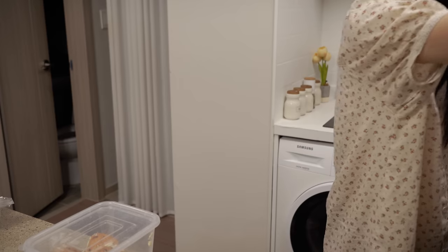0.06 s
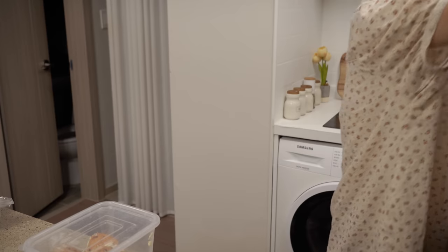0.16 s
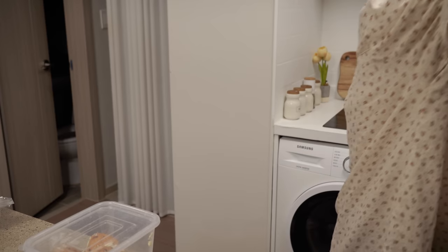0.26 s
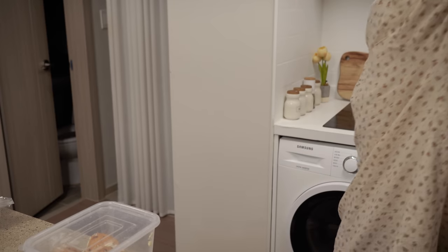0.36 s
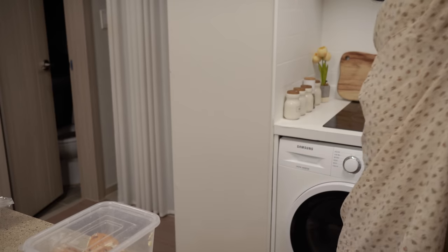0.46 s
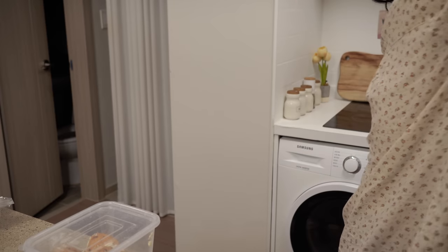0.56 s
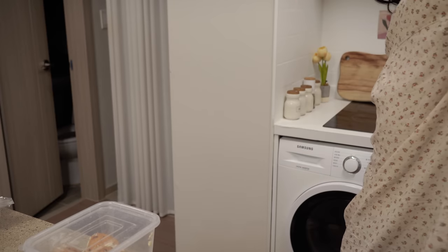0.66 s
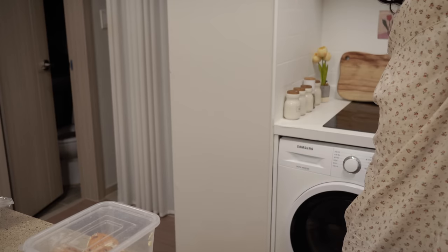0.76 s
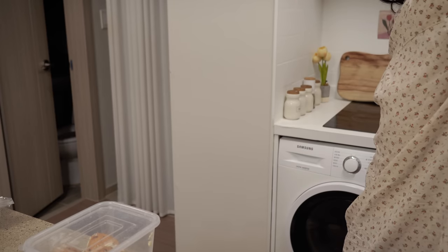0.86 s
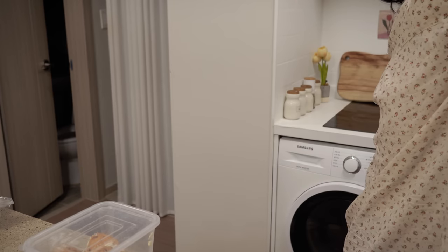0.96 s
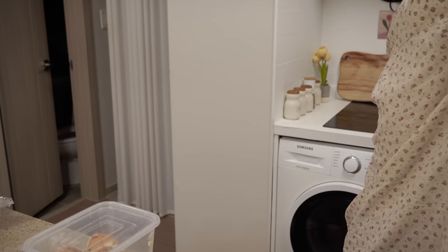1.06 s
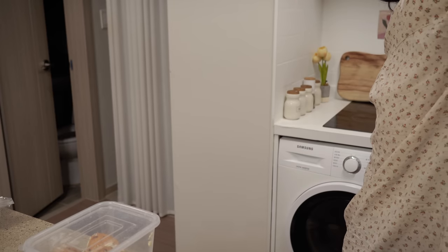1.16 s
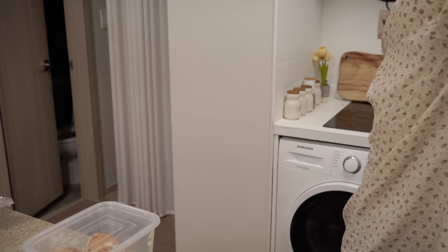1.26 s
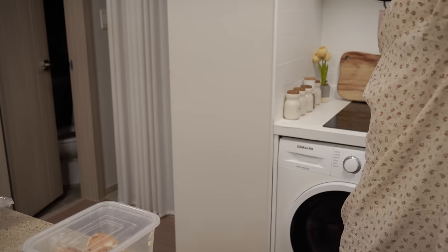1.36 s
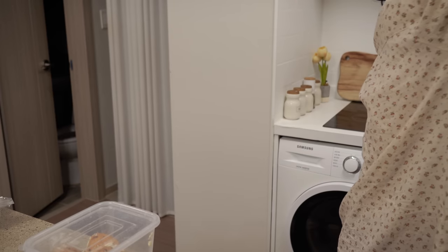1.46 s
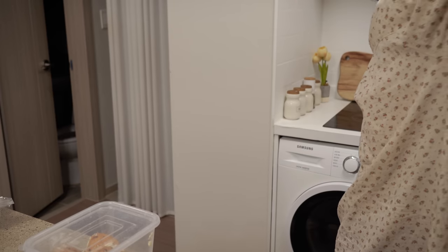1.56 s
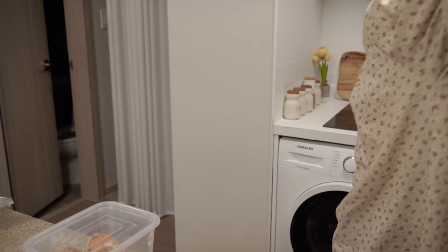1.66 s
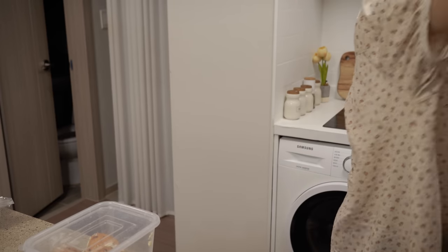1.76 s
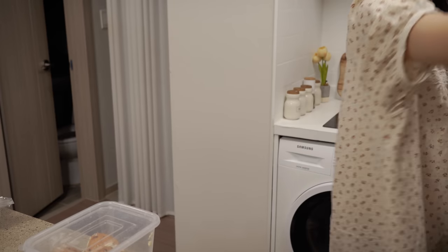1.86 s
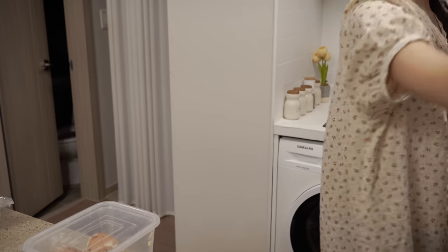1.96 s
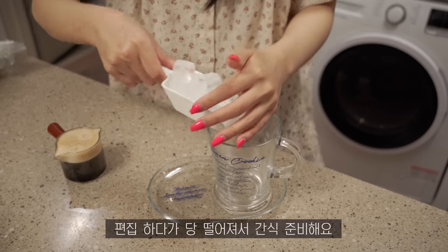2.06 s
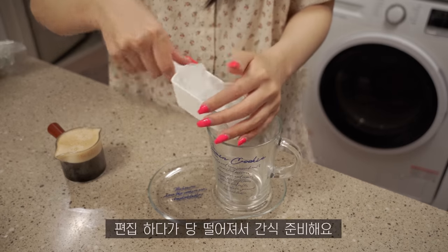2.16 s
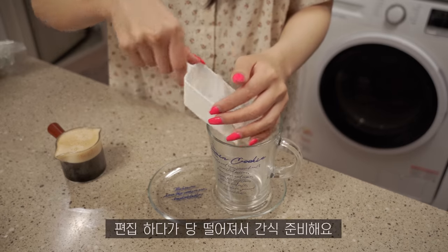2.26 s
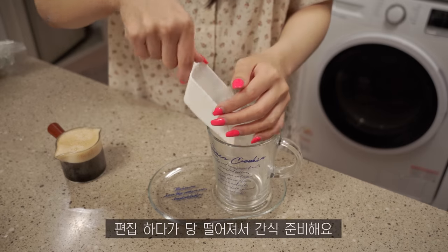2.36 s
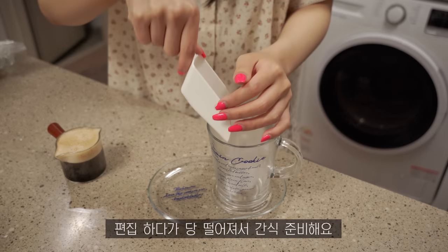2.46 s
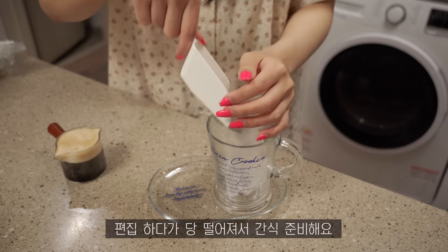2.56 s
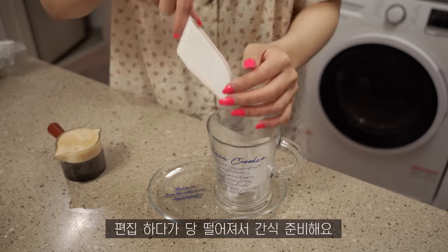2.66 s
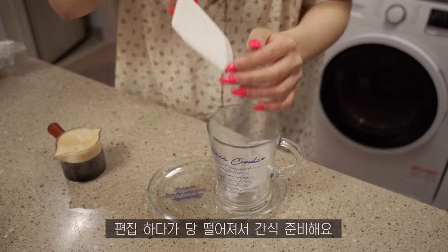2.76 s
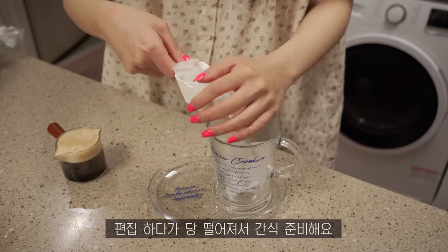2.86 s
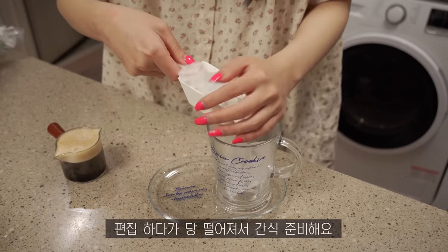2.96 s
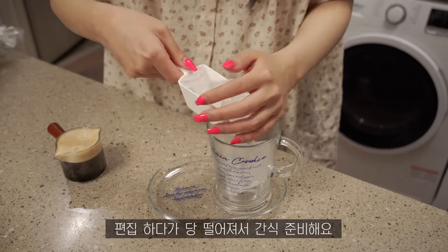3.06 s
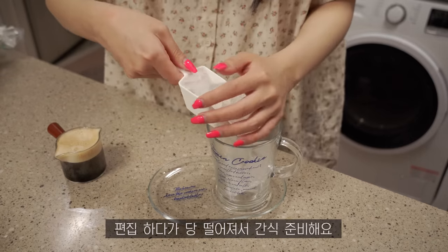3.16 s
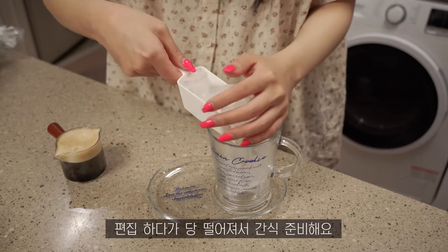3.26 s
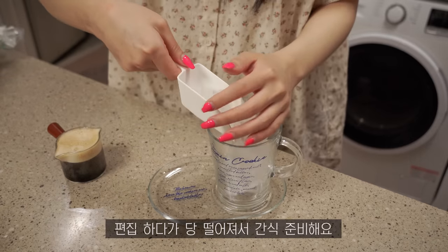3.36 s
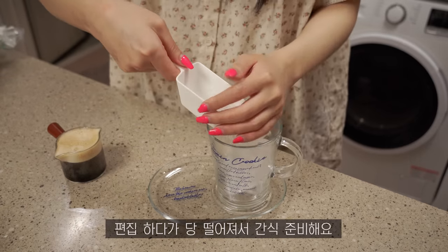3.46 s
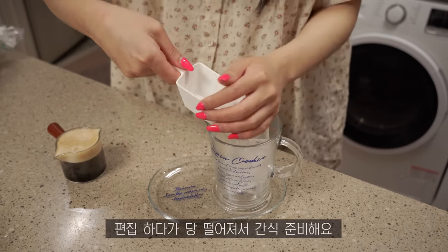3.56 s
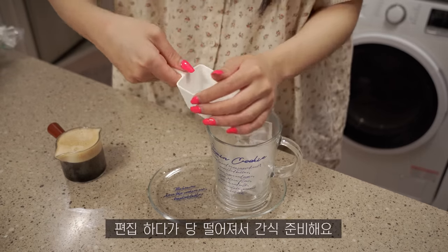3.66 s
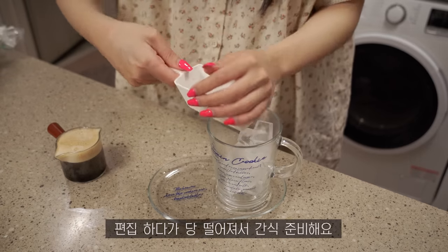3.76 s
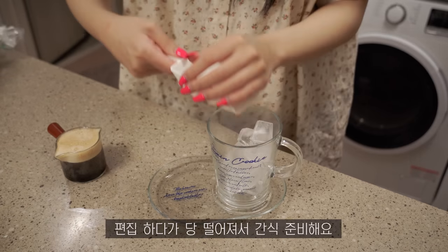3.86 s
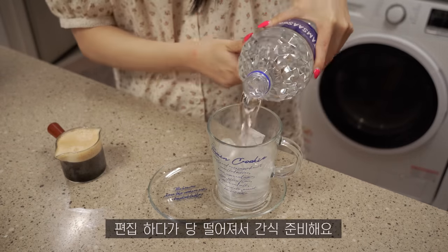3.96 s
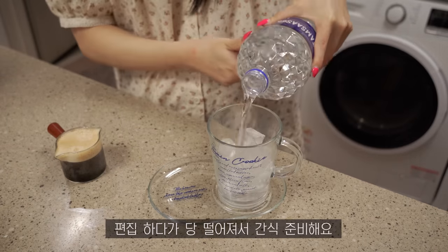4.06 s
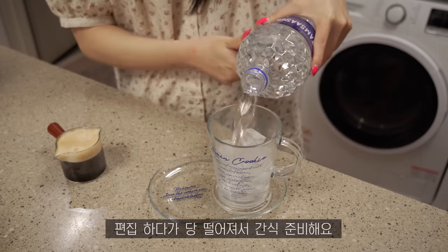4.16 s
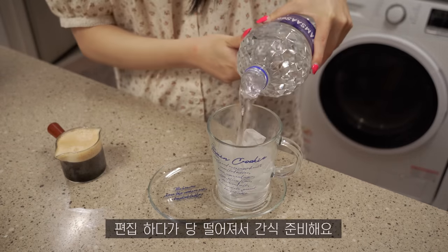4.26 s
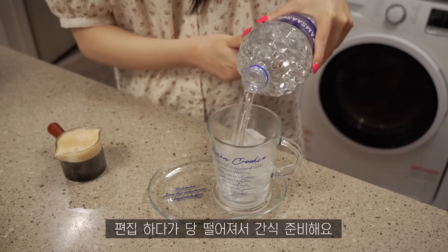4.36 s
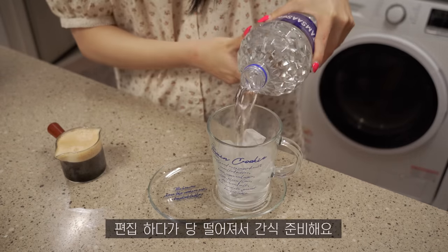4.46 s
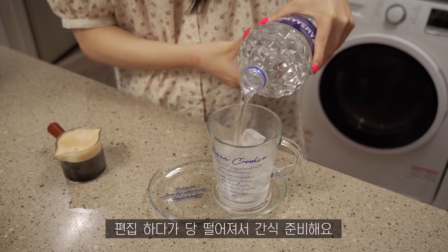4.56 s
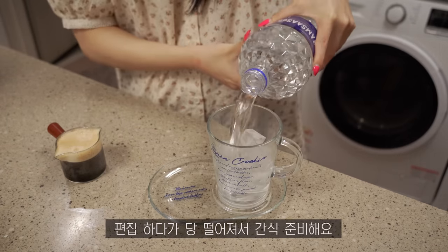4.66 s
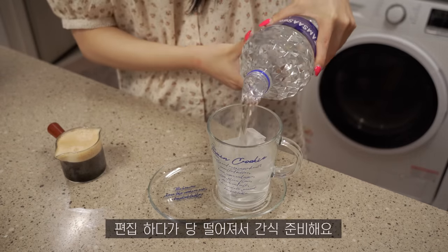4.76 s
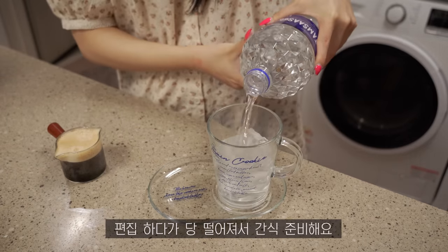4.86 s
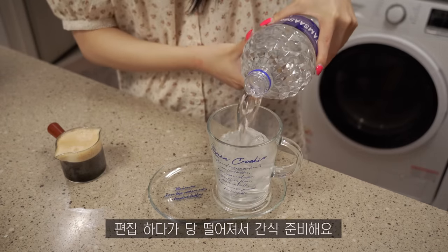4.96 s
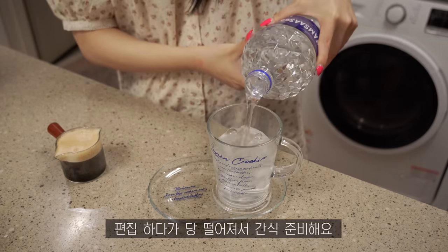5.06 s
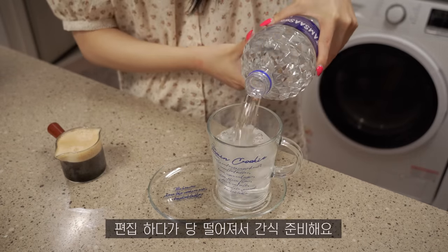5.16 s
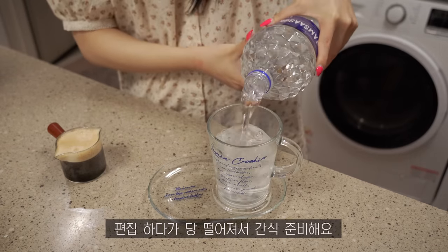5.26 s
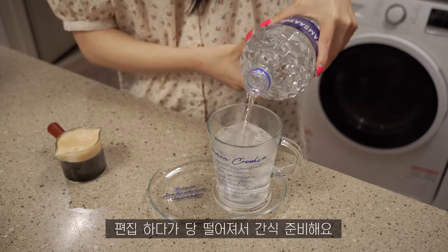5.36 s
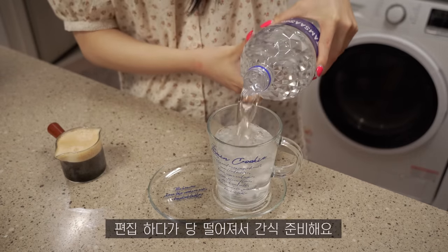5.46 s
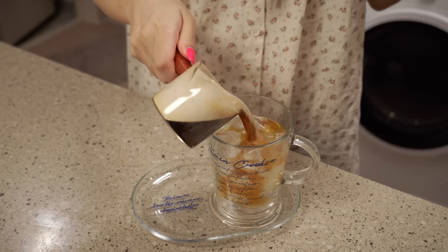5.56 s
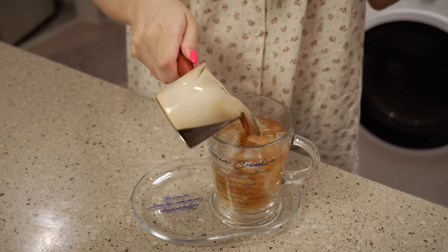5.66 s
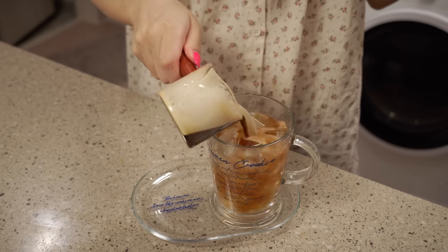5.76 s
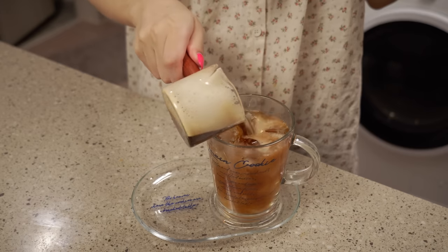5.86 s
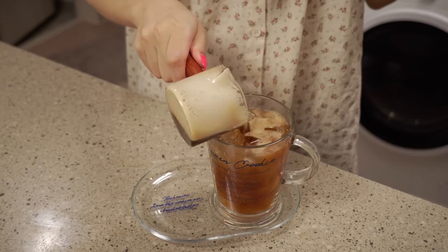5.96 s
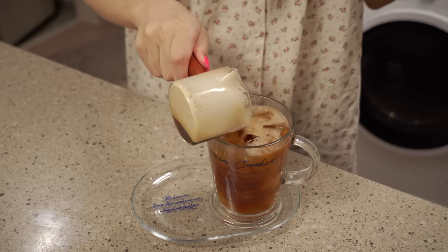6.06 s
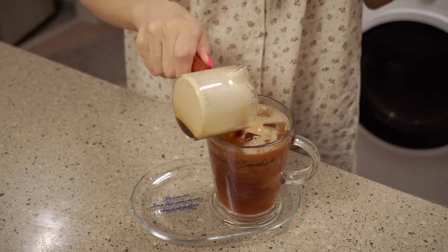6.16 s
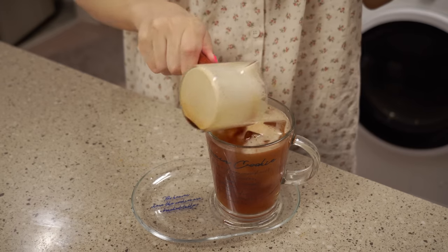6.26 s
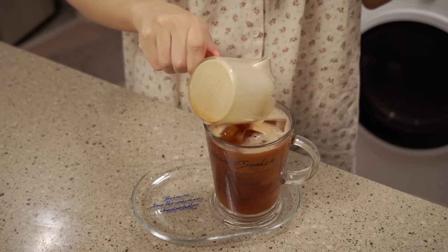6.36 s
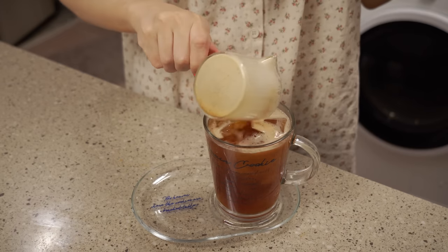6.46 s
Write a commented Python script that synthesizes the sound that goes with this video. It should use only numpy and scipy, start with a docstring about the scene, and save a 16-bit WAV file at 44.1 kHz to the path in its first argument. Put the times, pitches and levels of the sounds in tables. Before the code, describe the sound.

A door bumps shut and crockery clinks faintly across a small kitchen. Then, close to the microphone, ice cubes scrape and clack down a plastic scoop into a glass mug in two bursts, with bright glassy pings. Water pours over them, bubbling and gurgling while the ice snaps. Finally, a small jug and the full mug knock dully, with tiny squeaks, over a low hum.

```python
"""A small kitchen, where iced coffee is being made. A door bumps shut and crockery clinks across the room.
Close by, ice rattles out of a plastic scoop into a glass mug in two goes; water is poured over it,
bubbling while the cubes crack; then a small coffee jug knocks against the full mug, with faint squeaks.
Knocks are shaped noise, ringing things are sums of fading sine tones, and the water is a swarm of
short bubble notes. A made-up room echo surrounds each of them, over a low hum and a soft hiss."""
import sys
import numpy as np
from scipy import signal
from scipy.fft import rfft, irfft, next_fast_len
from scipy.io import wavfile
from scipy.ndimage import map_coordinates

SR = 44100
rng = np.random.default_rng(int(sys.argv[2]) if len(sys.argv) > 2 else 0)


def bounce(signal):
    """Save signal as a 16-bit WAV file at the path given by the first command-line argument."""
    frames = np.transpose(np.atleast_2d(signal))
    limited = np.clip(frames, -1, 1)
    pcm = np.round(limited * 32767).astype(np.int16)
    wavfile.write(sys.argv[1], SR, pcm)


N = 287973  # length of the scene in samples, about 6.5 s
T = np.arange(SR * 3 // 4) / SR  # clock in seconds for one short sound
TOP_HZ = 16300  # nothing sounds above this
POUR_START_S, POUR_END_S = 4.028, 5.52  # the bottle tips and, later, begins to be righted


def amp(db):
    """Turn decibels into a multiplier."""
    return 10 ** (np.asarray(db) / 20)


def unit(x):
    """Scale a sound to an rms level of 1."""
    return x / np.sqrt(np.mean(x ** 2) + 1e-20)


def along(points, hz):
    """Read (Hz, value) points at any frequency, joined by straight lines on a log axis."""
    point_hz, values = np.transpose(points)
    return np.interp(np.log(hz + 1), np.log(point_hz + 1), values)


def fade(t60, t=T):
    """Fade exponentially, losing 60 dB in t60 seconds."""
    return np.exp(-np.log(1000) * t / np.maximum(t60, 1e-4))


def add(track, s, sound):
    """Mix a sound into a track at s seconds, cutting what runs past the end."""
    part = track[round(s * SR):][:len(sound)]
    part += sound[:len(part)]


def filtered(x, response):
    """Multiply the spectrum of x by a function of frequency."""
    size = next_fast_len(x.shape[-1] + SR // 2)
    hz = np.fft.rfftfreq(size, 1 / SR)
    return irfft(rfft(x, size) * response(hz), size)[..., :x.shape[-1]]


def colour(x, points, size=4096):
    """Give x a spectrum with a unit-energy filter that never sounds ahead of time."""
    gains = amp(along(points, np.fft.rfftfreq(size, 1 / SR)))
    # folding the cepstrum forward in time gives the minimum-phase filter
    cepstrum = irfft(np.log(np.maximum(gains, 1e-5)))
    cepstrum[1:size // 2] *= 2
    cepstrum[size // 2 + 1:] = 0
    pulse = irfft(np.exp(rfft(cepstrum)))
    return signal.oaconvolve(x, pulse / np.linalg.norm(pulse))[:len(x)]


def burst(t60):
    """Make noise that starts at rms 1 and dies away."""
    shape = fade(t60)
    noise = rng.standard_normal(len(T)) * shape
    return noise * np.linalg.norm(shape) / np.linalg.norm(noise)


def ring(modes, vary_db, attack=0.000079):
    """Ring a solid object: each natural note fades at its own pace, at a new strength for every blow."""
    tones = np.zeros(len(T))
    for hz, db, t60 in modes:
        luck, sign = rng.standard_normal(2)
        strength = amp(db + vary_db * luck) * np.sign(sign)
        tones += strength * fade(t60) * np.sin(2 * np.pi * hz * T)
    return tones * (1 - np.exp(-T / attack))


def cube(hz, t60):
    """Ring a lump of ice briefly on two unrelated notes, the lower one at hz."""
    low = np.sin(2 * np.pi * hz * T) * fade(t60)
    high = np.sin(2 * np.pi * hz * 1.51 * T) * fade(t60 / 1.51)
    return low + 0.25 * high


def bubble(hz, t60, t, rise):
    """Sound one bubble, whose note climbs as it nears the surface."""
    climb = 1 + rise * np.minimum(t / t60, 1)
    onset = 1 - np.exp(-t * hz / 2)
    return np.sin(2 * np.pi * hz * t * climb) * fade(t60, t) * onset


def cloud(times, pitch_hz, spread, t60, rise, size_db=4.8):
    """Scatter short pings around a middle pitch, of unit energy in all; higher ones die sooner."""
    out = np.zeros(N)
    middles = pitch_hz * np.ones(len(times))
    chances = np.clip(rng.standard_normal((len(times), 2)), -2, 2)
    for s, middle, (pitch, size) in zip(times, middles, chances):
        hz = min(middle * np.exp(spread * pitch), TOP_HZ)
        life = t60 * np.sqrt(1900 / hz)  # t60 belongs to a 1900 Hz ping
        level = amp(size_db * size - 2 * pitch ** 2)  # pitches far from the middle are weaker
        add(out, s, level * bubble(hz, life, T[:int(life * SR) + 2], rise))
    return out / np.linalg.norm(out)


def grains(rate, spread_db):
    """Make random ticks of uneven size, about `rate` a second, at rms 1."""
    sizes = amp(spread_db * np.clip(rng.standard_normal(N), -2, 2)) * rng.choice([-1, 1], N)
    return unit(sizes * (rng.random(N) < rate / SR))


def wobble(rate_hz):
    """Draw a smooth curve through random points, rate_hz of them a second."""
    return map_coordinates(rng.standard_normal(512), [np.arange(N) * rate_hz / SR], mode="wrap")


def low_cut(x, hz, order=2):
    """Remove the bass below hz."""
    return signal.sosfilt(signal.butter(order, hz, "high", fs=SR, output="sos"), x)


def stereo(mid, side, side_db):
    """Make left and right from a shared part and an opposed part."""
    return np.array([mid + amp(side_db) * side, mid - amp(side_db) * side])


# How long the room rings at each pitch. Each row: frequency in Hz, time to fade by 60 dB in seconds.
KITCHEN_DECAY = [(120, 0.54), (500, 0.42), (2000, 0.2), (6000, 0.25), (14000, 0.21)]


def kitchen(x, wet_db, pan_db, early_db):
    """Add quick reflections off the counter and the room's tail; a positive pan leans left."""
    hz, t, z = signal.stft(rng.standard_normal((2, len(T))), SR, nperseg=256)
    decaying = z * fade(along(KITCHEN_DECAY, hz)[:, None], t)
    tail = signal.istft(decaying, SR, nperseg=256)[1][:, :len(T)]
    tail *= 1 - fade(0.066)  # the tail builds up gradually
    early = rng.standard_normal((2, len(T))) * fade(0.095) * (T > .0012)
    tail /= np.linalg.norm(tail, axis=1, keepdims=True)
    early /= np.linalg.norm(early, axis=1, keepdims=True)
    mid, side = amp(wet_db) * tail + amp(early_db) * early
    echo = signal.oaconvolve(x[None], stereo(mid, side, side_db=-2), axes=1)[:, :N]
    return (x + echo) * amp([[pan_db / 2], [-pan_db / 2]])


# Tone of the hum. Each row: frequency in Hz, strength in dB per Hz (relative).
HUM_SPECTRUM = [(15, -42), (25, -23), (59, -4), (132, 0), (157, -11), (175, 3), (217, -2.5), (249, -5.5),
                (361, -6), (898, -21), (1000, -12), (1300, -57), (2200, -120)]
# Tone of the hiss. Each row: frequency in Hz, strength in dB per Hz (relative).
HISS_SPECTRUM = [(410, -22), (700, -4), (900, -8.5), (1190, -5), (1650, -8), (1790, -8.5), (15200, -20.5),
                 (16500, -52)]
# The levels step from stretch to stretch.
# Each row: start in seconds, hum level in dB, hiss level in dB (both for the part shared by left and right).
TONE_STRETCHES = [(0, -65, -67.5), (2.059, -78.5, -78), (2.897, -65, -76), (4.031, -61.5, -66),
                  (5.6, -58, -67)]


def room_tone():
    """Shape noise into a low appliance hum and a soft hiss, steady within each stretch."""
    def wide_noise(spectrum, side_db):
        mid = unit(colour(rng.standard_normal(N), spectrum))
        side = unit(colour(rng.standard_normal(N), spectrum))
        return stereo(mid, side, side_db)

    starts, hum_db, hiss_db = np.transpose(TONE_STRETCHES)
    now = np.searchsorted(starts[1:], np.arange(N) / SR)
    hum = amp(hum_db[now]) * wide_noise(HUM_SPECTRUM, side_db=-4.5)
    hiss = amp(hiss_db[now]) * wide_noise(HISS_SPECTRUM, side_db=-1.0)
    return hum + hiss


# The door meeting its frame. Each row: start in seconds, level in dB, hardness from 0 to 1.
DOOR_HITS = [(0.147, -23, 0.96), (0.157, -31, 0.75), (0.236, -28, 0.14), (0.284, -33.5, 0.13)]
# Tone of the slap. Each row: frequency in Hz, strength in dB per Hz (relative).
DOOR_SLAP_SPECTRUM = [(29, -47), (50, -25), (285, -6), (575, -14.5), (667, -17.5), (1180, -12),
                      (1320, -16.5), (1530, -19), (2010, -29.5), (2190, -29.5), (8000, -65), (10400, -90),
                      (17600, -120)]
# Notes of the door panel. Each row: frequency in Hz, relative level in dB, time to fade by 60 dB in seconds.
DOOR_PANEL = [(72, -4, 0.25), (112, -1.5, 0.31), (137, 5, 0.11), (162, 4, 0.15), (201, 2, 0.12),
              (261, 0, 0.52), (313.6, -1, 0.19), (486, -1.5, 0.077), (875, -22, 0.32), (1220, -27, 0.23)]


def door():
    """The door slaps its frame, then rebounds more softly while the panel booms."""
    out = np.zeros(N)
    for s, db, hardness in DOOR_HITS:
        slap = hardness * colour(burst(0.15), DOOR_SLAP_SPECTRUM)
        boom = amp(-10.0) * ring(DOOR_PANEL, vary_db=1.0, attack=0.0037)
        add(out, s, amp(db) * (slap + boom))
    return kitchen(out, wet_db=-11.0, pan_db=1.0, early_db=-8.5)


# Far knocks. Each row: start in seconds, level in dB, low edge in Hz, high edge in Hz,
# time to fade by 60 dB in seconds.
FAR_KNOCKS = [(0.063, -39, 1220, 11000, 0.017), (0.643, -57, 4170, 11000, 0.17),
              (0.784, -44.5, 920, 2740, 0.33), (0.865, -35, 147, 660, 0.032), (0.872, -25, 257, 358, 0.052),
              (1.037, -47, 710, 1300, 0.46), (1.084, -59.5, 1300, 1360, 0.51), (1.05, -56, 123, 287, 1),
              (1.39, -53.5, 910, 4840, 0.023), (1.411, -40.5, 392, 4000, 0.035)]


def cupboard():
    """Things are moved and set down across the room: fading noise, each knock in its own pitch band."""
    out = np.zeros(N)
    for s, db, low_hz, high_hz, t60 in FAR_KNOCKS:
        below = [(low_hz / 8, -50), (low_hz / 2, -16), (low_hz, 0)]
        above = [(high_hz, -2), (high_hz * 2, -26), (high_hz * 4, -60)]
        knock = colour(burst(t60), below + above)
        knock *= np.linalg.norm(fade(t60)) / np.linalg.norm(knock)  # the band does not change the energy
        add(out, s, amp(db) * knock)
    return kitchen(out, wet_db=-9.5, pan_db=1.5, early_db=-0.5)


# Notes of three things across the room.
# Each row: frequency in Hz, relative level in dB, time to fade by 60 dB in seconds.
SMALL_DISH_MODES = [(2560, -16, .2), (3480, -8, .15), (4269, 0, .17), (5350, -7, .12), (6002, -4, .19),
                    (6551, -8, .2), (8156, -8, .16), (10440, -13, .2), (12900, -18, .16)]
LARGE_DISH_MODES = [(1320, -7, .2), (1604, -4, .16), (2159, -9, .24), (2579, -7, .24), (2950, -10, .62),
                    (3120, -6, .22), (3165, -6, .25), (3390, -3, .15), (3510, -5, .14), (4253, -7, .2),
                    (4440, -7, .15), (4497, -3, .22), (4650, -5, .17), (5755, -10, .16), (6030, -7, .12),
                    (7413, -20, .2), (8382, -18, .25), (11050, -21, .22)]
JAR_MODES = [(291.5, -2, 0.15), (437, -10.5, 0.27), (766, -9, 0.42), (1155, 8.5, 0.035), (1780, -6.5, 0.19),
             (2620, -7.5, 0.17), (3250, -3, 0.045)]
# The large dish chatters as it is put down. Each row: start in seconds, level in dB.
LARGE_DISH_HITS = [(0.782, -44), (0.799, -42.5), (0.811, -56.5)]


def dishes():
    """A small and a large dish ring with a clink, a few steps away; a jar is set down."""
    out = np.zeros(N)
    add(out, 0.642, amp(-45) * ring(SMALL_DISH_MODES, vary_db=1, attack=.01))
    for s, db in LARGE_DISH_HITS:
        add(out, s, amp(db) * ring(LARGE_DISH_MODES, vary_db=2, attack=.002))
    add(out, 1.411, amp(-45) * ring(JAR_MODES, vary_db=1, attack=.001))
    return kitchen(out, wet_db=-9, pan_db=1, early_db=-12)


# Thin falling squeaks. Each row: start in seconds, length in seconds, first pitch in Hz,
# last pitch in Hz, level in dB.
SQUEAK_GLIDES = [(5.917, 0.031, 9550, 9000, -64.5), (5.967, 0.014, 4930, 4350, -58.5),
                 (5.989, 0.029, 10040, 5900, -61), (6.036, 0.0106, 10040, 7700, -51.5),
                 (6.055, 0.029, 4660, 4050, -57)]


def squeaks():
    """Faint squeaks slide downward as the coffee runs in; a fast pitch wobble makes them rough."""
    out = np.zeros(N)
    for s, length, start_hz, end_hz, db in SQUEAK_GLIDES:
        glide = np.linspace(start_hz, end_hz, int(length * SR))
        glide *= 1 + .05 * wobble(1100)[:len(glide)]
        tone = np.sin(2 * np.pi * np.cumsum(glide) / SR)
        add(out, s, amp(db) * np.hanning(len(glide)) * tone)
    return kitchen(out, wet_db=-9, pan_db=-3, early_db=-5)


# Dull blows. Each row: start in seconds, relative level in dB, hardness from 0 to 1, pitch of the thud in Hz.
MUG_BLOWS = [(2.491, -23.5, 0.05, 690), (5.732, -20, 0.56, 1740), (5.7841, -22.5, 0.08, 840),
             (5.804, -37, 0.56, 900), (5.814, -38.5, 0.4, 690), (6.086, -25.5, 0.29, 361),
             (6.158, -36.5, 0.4, 790), (6.468, -33, 0.18, 363)]
# Notes of the mug on its saucer.
# Each row: frequency in Hz, relative level in dB, time to fade by 60 dB in seconds.
SAUCER_MODES = [(144, -8.5, 0.044), (192, -1.5, 0.033), (337, -2, 0.015), (550, -4, 0.0051),
                (787, -3, 0.023), (1050, 1, 0.012), (1210, -2, 0.028), (1630, -3, 0.021), (2440, -4, 0.013),
                (2860, 2, 0.0062), (5000, -9, 0.013), (5900, -7, 0.018)]


def blows():
    """Dull knocks pass through mug and saucer into the counter; softer ones lose their treble."""
    tick_spectrum = [(40, -20), (150, 3), (480, -5), (800, 1), (1700, 3), (2200, -12), (3100, -8),
                     (4200, -20), (6000, -15), (15000, -30)]  # (Hz, dB per Hz)
    out = np.zeros(N)
    for s, db, hardness, hz in MUG_BLOWS:
        loss_db = 6 * (1 - hardness)  # per octave above 500 Hz
        modes = [(note, level - loss_db * np.log2(max(note / 500, 1)), t60)
                 for note, level, t60 in SAUCER_MODES]
        tick = hardness * colour(burst(0.025), tick_spectrum)
        thud = np.sin(2 * np.pi * hz * T) * fade(8 / hz)  # gone after eight cycles
        blow = ring(modes, vary_db=-1.0) + amp(-5.5) * tick + amp(5.5) * thud
        add(out, s, amp(db - 5.5) * blow)
    return kitchen(low_cut(out, hz=107), wet_db=-12.0, pan_db=-4.0, early_db=-6.0)


# Cubes dragging along the scoop. Each row: start in seconds, length in seconds, level in dB, pitch in Hz.
SCOOP_SCRAPES = [(2.052, 0.29, -55.5, 1710), (2.138, 0.066, -52, 5300), (3.015, 0.12, -49, 1760),
                 (3.886, .11, -67, 5080)]


def scrapes():
    """A dragged cube sticks and slips, and every slip rings it."""
    out = np.zeros(N)
    for s, length, db, hz in SCOOP_SCRAPES:
        swell = np.hanning(int(length * SR))
        slips = signal.oaconvolve(grains(rate=1200, spread_db=4)[:SR // 2], cube(hz, t60=.012))
        add(out, s, amp(db) * swell * unit(slips[:len(swell)]))
    return kitchen(out, wet_db=-16, pan_db=-4.0, early_db=-4.5)


SWELL_DB = 17  # the rattle grows by this much as the cubes get moving


def tilt(s, swell, hold, db, settle_db_per_s):
    """Follow the speed of the cubes in one tilt: they get moving, run, then settle."""
    t = np.arange(N) / SR - s
    still_to_grow = SWELL_DB * np.clip(1 - t / swell, 0, 1)
    settled = settle_db_per_s * np.maximum(t - swell - hold, 0)
    return (t > 0) * amp(db - still_to_grow - settled)


# Tilts of the scoop. Each row: start in seconds, swell in seconds, hold in seconds, relative level in dB,
# settling in dB per second, share that spills into the mug from 0 to 1.
SCOOP_TILTS = [(2.059, 0.26, 0.065, -40.5, 88.5, 0), (2.464, 0.082, 0.13, -37.5, 252, 0.8),
               (2.895, 0.17, 0.039, -43.5, 250, 0.13), (3.261, 0.14, 0.14, -39, 96, 0.7)]
# Loudest clacks of cube on cube. Each row: start in seconds, relative level in dB, the cube's own note in Hz.
CUBE_CLACKS = [(2.065, -24, 1770), (2.143, -37.5, 1800), (2.192, -42, 1670), (2.1964, -38, 1670),
               (2.2094, -32, 1640), (2.255, -31, 1540), (2.2634, -24.5, 1880), (2.2866, -28.5, 1630),
               (2.296, -24, 1680), (2.3285, -30, 1630), (2.343, -20.5, 2200), (2.358, -19.5, 2890),
               (2.3834, -17.5, 1700), (2.389, -27, 2700), (2.4161, -23, 1750), (2.5339, -19.5, 4720),
               (2.5625, -17.5, 5920), (2.574, -23, 4800), (2.6023, -20.5, 2740), (2.6095, -21, 2585),
               (2.6731, -22, 3150), (2.712, -32, 2080), (2.8984, -32, 1690), (3.0182, -30, 1720),
               (3.072, -24.5, 1590), (3.109, -24.5, 1730), (3.128, -29.5, 1710), (3.189, -38.5, 3920),
               (3.207, -29, 6170), (3.297, -34.5, 2870), (3.352, -32.5, 1710), (3.386, -20, 2146),
               (3.394, -20.5, 4480), (3.413, -16.5, 4740), (3.4464, -15, 2700), (3.455, -15.5, 2940),
               (3.463, -14.5, 1890), (3.47, -28, 2870), (3.517, -22, 2030), (3.524, -21, 3670),
               (3.5352, -20, 4940), (3.542, -16, 5880), (3.557, -27, 1710), (3.566, -22, 2810),
               (3.602, -20, 4620), (3.6133, -21, 1680), (3.6574, -25.5, 1590), (3.664, -36, 1680),
               (3.755, -38.5, 5160), (3.7925, -41, 1590)]
# Tone of ice contacts. Each row: frequency in Hz, strength in dB per Hz (relative).
ICE_SPECTRUM = [(40, -68), (100, -5.5), (160, 1.5), (420, -14), (660, -18.5), (1050, -7), (1700, -14),
                (2800, -6.5), (3600, -4), (5200, -3.5), (6800, -8), (9400, -8.5), (14000, -20.5),
                (16000, -34)]
# Resonances of the scoop's hollow. Each row: frequency in Hz, width in Hz, boost in dB.
SCOOP_HOLLOW = [(165, 50, -8), (662, 55, 21), (1700, 140, 13.5), (2270, 130, 6), (2780, 130, 5)]
# Cubes skating on glass. Each row: frequency in Hz, strength in dB per Hz (relative).
SKATE_SPECTRUM = [(300, -2), (1500, 3), (3000, -0.5), (5500, 4), (7000, -10), (9000, -9), (12000, -15),
                  (16000, -15)]


def hollow(hz):
    """The scoop's hollow lets sound through and boosts it near a few resonances."""
    response = 1
    for centre, width, db in SCOOP_HOLLOW:
        damping = 1j * hz * width
        response = response + amp(db) * damping / (centre * centre - hz * hz + damping)
    return response


def scoop(count=1000):
    """Cubes scrape and clack down the scoop, whose hollow colours the contacts, then skate into the mug."""
    contacts, notes, slide, spill = np.zeros((4, N))
    for s, db, hz in CUBE_CLACKS:
        add(contacts, s, amp(db - 10.0) * colour(burst(0.016), [(3000, -0.5), (9000, -4)]))
        add(notes, s, amp(db - 8) * cube(hz, t60=.024))
    for *motion, share in SCOOP_TILTS:
        speed = tilt(*motion)
        slide += speed * np.sqrt(1 - share)
        spill += speed * np.sqrt(share)
    jerks = amp(2.6 * wobble(90))  # the sliding is uneven
    contacts += amp(-6) * slide * jerks * grains(rate=600, spread_db=5)

    start, end = SCOOP_TILTS[0][0], POUR_START_S
    taps = cloud(rng.uniform(start, end, count), pitch_hz=2100, spread=.55, t60=.009, rise=0)
    jostle = amp(-11) * slide * jerks * taps * np.sqrt((end - start) * SR)

    # lighter collisions among the sliding cubes
    clatter = unit(signal.oaconvolve(grains(rate=100, spread_db=3), burst(.006))[:N])
    skating = amp(-10.5) * spill * jerks * grains(rate=1800, spread_db=4.0)
    skate = colour(skating + amp(-13.5) * (slide + spill) * clatter, SKATE_SPECTRUM)

    in_scoop = amp(-2.5) * filtered(colour(contacts, ICE_SPECTRUM) + jostle, hollow)
    rattle = low_cut(notes + skate + in_scoop, hz=125, order=4)
    return kitchen(rattle, wet_db=-10, pan_db=-2.5, early_db=-8)


# Cubes striking the mug. Each row: start in seconds, relative level in dB, place from 0 at the wall
# to 1 at the base, favoured note in Hz.
MUG_STRIKES = [(2.33, -53.5, 0.15, 4590), (2.416, -49, 1, 9350), (2.531, -49, 1, 4700),
               (2.544, -43.5, .6, 4700), (2.555, -39, 0, 5850), (2.575, -45, 0, 8100),
               (2.602, -41.5, 0, 2620), (2.626, -45, 0, 4500), (2.673, -44.5, 1, 3200),
               (2.711, -53.5, 1, 4800), (3.386, -41, 0.81, 4590), (3.393, -41.5, 0.66, 5850),
               (3.414, -48, 0.3, 8100), (3.443, -46, 0.88, 4700), (3.492, -42.5, 0.67, 9040),
               (3.5, -45, 0.46, 4590), (3.515, -34, 0.45, 8950), (3.543, -44, 1, 4860),
               (3.601, -46, 0.75, 5850), (3.692, -55, 0.34, 9300)]
# Notes of the mug. Each row: frequency in Hz, relative level in dB when struck on the wall,
# relative level in dB when struck on the base, time to fade by 60 dB in seconds.
MUG_MODES = [(2013, -16, -9, .42), (2110, -16, -8, .42), (2622, -8, -20, .2), (2885, -18, -9, .2),
             (2998, -11, -20, .25), (4130, -15, -18, .2), (4590, -1, -10, .24), (4759, -9, -2, .17),
             (5815, -10, -16, .12), (5862, -5, -10, .15), (6950, -19, -22, .15), (8080, -12, -24, .2),
             (8181, -13, -21, .2), (8705, -20, -12, .15), (9044, -17, -9, .15), (9595, -11, -27, .28),
             (12490, -24, -28, .25), (13470, -19, -30, .22), (14410, -25, -30, .22)]
FAVOUR_DB, FAVOUR_OCTAVES = 10.5, 0.15  # a strike brings out the modes near one note
FLASH_DB, FLASH_T60_S = 9, .08  # the ring is loudest while the cube still chatters on the glass
GLASS_DB, GLASS_BLUR_HZ = -2, 8.9  # level of the ringing; jostling cubes blur its notes a little


def mug():
    """Falling cubes feed the modes of the glass, which ring on from blow to blow; place sets which speak."""
    chink_spectrum = [(200, -22), (1500, -3), (3000, 6), (5500, 5), (7200, -10), (9000, -7),
                      (15000, -26)]  # (Hz, dB per Hz)
    out, energy = np.zeros(N), np.zeros((len(MUG_MODES), N))
    onset = (1 + amp(FLASH_DB) * fade(FLASH_T60_S)) * (1 - fade(.012))
    for s, db, place, note_hz in MUG_STRIKES:
        for track, (hz, wall, base, t60) in zip(energy, MUG_MODES):
            favour = FAVOUR_DB * np.exp(-(np.log2(hz / note_hz) / FAVOUR_OCTAVES) ** 2)
            level = db + wall + place * (base - wall) + favour + rng.standard_normal()
            add(track, s, (amp(level) * onset * fade(t60)) ** 2)
        add(out, s, amp(db) * colour(burst(0.035), chink_spectrum))
    for track, (hz, *_) in zip(energy, MUG_MODES):
        drift = rng.standard_normal(N) * np.sqrt(2 * np.pi * GLASS_BLUR_HZ / SR)
        phase = np.cumsum(2 * np.pi * hz / SR + drift)
        out += amp(GLASS_DB) * np.sqrt(track) * np.sin(phase)
    return kitchen(out, wet_db=-11, pan_db=-4.5, early_db=-14)


# Ice cracking in the water. Each row: start in seconds, relative level in dB, pitch of the snap in Hz,
# relative treble in dB.
ICE_CRACKS = [(4.032, -36, 2900, -6), (4.071, -25.5, 2400, 8), (4.152, -27.5, 4660, 12.5),
              (4.3963, -35.5, 2300, 16), (4.518, -11, 1390, 3.5), (4.655, -25, 2600, -3.5),
              (4.776, -30.5, 1470, 4), (4.883, -17, 2800, 0.5), (4.994, -26.5, 1660, -2.5),
              (5.073, -39.5, 3010, 13), (5.108, -25, 5500, 10), (5.115, -16.5, 4670, 0),
              (5.119, -17, 5900, 0.5), (5.3101, -10, 2120, -12), (5.493, -31.5, 5500, -0.5)]
# Tone of the spit of a crack. Each row: frequency in Hz, strength in dB per Hz (relative).
SPIT_SPECTRUM = [(60, -34), (300, -12), (1500, -3), (4000, -5), (5800, -2), (6600, -7), (8500, -1),
                 (11000, -8), (14000, -9), (16000, -17)]
# Notes of the mug with water in it.
# Each row: frequency in Hz, relative level in dB, time to fade by 60 dB in seconds.
FILLED_MUG_MODES = [(1270, -7, .06), (5870, -3, .07), (8000, -1, .05), (8570, -1, .05), (9010, 1, .07)]
# Floating cubes bump the wall. Each row: start in seconds, level in dB.
WALL_BUMPS = [(4.9295, -27), (4.968, -48), (5.04, -36), (5.526, -37.5)]
# Notes of a floating cube against the wall.
# Each row: frequency in Hz, relative level in dB, time to fade by 60 dB in seconds.
WALL_BUMP_MODES = [(1730, 0.5, 0.013), (2780, 0.5, 0.011), (3470, -5, 0.0084), (4320, 3, 0.0087),
                   (4660, -2, 0.017)]


def cracks():
    """Warmed by the water, cubes split with a snap and a spit that rings the mug; afloat, they bump its wall."""
    out = np.zeros(N)
    for s, db, hz, treble_db in ICE_CRACKS:
        tilt_db = 0.61 * max(treble_db, 0)  # brighter cracks gain this much per octave above 7 kHz
        spectrum = [(f, level + tilt_db * np.log2(max(f / 7000, 1))) for f, level in SPIT_SPECTRUM]
        spit = colour(burst(0.025), spectrum)
        glass = amp(-15) * ring(FILLED_MUG_MODES, vary_db=2)
        snap = cube(hz, t60=0.0058)
        add(out, s, amp(db - 4.5) * (snap + amp(treble_db - 10.5) * (spit + glass)))
    for s, db in WALL_BUMPS:
        add(out, s, amp(db) * ring(WALL_BUMP_MODES, vary_db=3))
    return kitchen(low_cut(out, hz=171), wet_db=-13.5, pan_db=-1.5, early_db=-5.5)


AIR_HZ, AIR_RISE_OCTAVES_PER_S, AIR_WIDTH_HZ = 1110, 0.33, 103  # start, climb and width of the resonance


def air_column(x, count=9):
    """Add the resonance of the air above the water, which climbs as the mug fills."""
    knots = np.linspace(POUR_START_S, POUR_END_S, count)
    out = np.zeros(N)
    # crossfade through a row of fixed filters, each a little higher
    for s, corner in zip(knots, np.eye(count)):
        hz = AIR_HZ * 2 ** (AIR_RISE_OCTAVES_PER_S * (s - POUR_START_S))
        share = np.interp(np.arange(N) / SR, knots, corner)
        out += signal.lfilter(*signal.iirpeak(hz, hz / AIR_WIDTH_HZ, SR), x * share)
    return x + amp(2.5) * out


# Tone of the splash. Each row: frequency in Hz, strength in dB per Hz (relative).
SPLASH_SPECTRUM = [(60, -51), (170, 11), (400, 5), (800, -9), (1500, -4.5), (2800, -6), (4600, 6),
                   (6600, -12.5), (16000, -42)]
# Strength of the bubbling, which dips when the stream falters as air enters the bottle. Each row: time in
# seconds, change in dB.
STREAM_FLOW = [(4.03, 0.5), (4.32, 1.5), (4.41, -8), (4.62, 0), (4.78, -2.5), (4.92, 2), (5.06, 2),
               (5.16, -0.5), (5.52, -3)]
# Gulps of the stream that churn up a cloud of bubbles. Each row: start in seconds, relative level in dB,
# middle pitch in Hz, time over which the bubbles start in seconds.
STREAM_GULPS = [(4.189, -43.5, 695, 0.091), (4.234, -40, 1870, 0.04), (4.323, -43.5, 1980, 0.03),
                (4.441, -38, 3800, 0.052), (4.638, -40, 1460, 0.03), (4.697, -36.5, 2870, 0.022),
                (4.82, -38.5, 1870, 0.06), (4.871, -38.5, 2130, 0.042), (4.962, -41.5, 1750, 0.098),
                (5.17, -41, 894, 0.03), (5.228, -47, 1710, .06), (5.313, -41.5, 1820, 0.07),
                (5.435, -40.5, 1680, 0.049), (5.495, -46.5, 1610, 0.046)]
# Loudest single bubbles. Each row: start in seconds, relative level in dB, starting pitch in Hz,
# time to fade by 60 dB in seconds.
SINGLE_BUBBLES = [(4.135, -37, 6030, 0.011), (4.199, -21, 371, 0.018), (4.237, -31, 527, 0.015),
                  (4.251, -27, 2760, 0.0091), (4.322, -25, 2800, 0.013), (4.449, -31, 3030, 0.017),
                  (4.479, -25.5, 2350, 0.015), (4.478, -22.5, 3560, 0.0089), (4.613, -36, 2520, 0.021),
                  (4.698, -32, 3110, 0.012), (4.717, -28.5, 3100, 0.0078), (4.873, -18.5, 3090, 0.0072),
                  (5.06, -29.5, 1170, 0.018), (5.062, -37.5, 563, 0.047), (5.179, -32.5, 1600, 0.018),
                  (5.37, -43, 777, 0.065), (5.46, -38.5, 4200, .014), (5.525, -36.5, 704, 0.042)]
POUR_RISE_S, POUR_STOP_S = 0.0044, .13  # how long the stream takes to start and to stop
POUR_DB, SURGE_DB, SURGE_HZ = -54, 2, 16  # base bubbling level, its unevenness and how fast it wavers
SPRAY_DB, SPRAY_FALL_DB_PER_S = -58, 7.5  # the spray dies down as the water covers the ice
# once the stream plunges into a pool, it traps larger bubbles; their pitch climbs as the pool deepens
POOL_S, GURGLE_DB, GURGLE_FALL_DB_PER_S = 4.82, -48.5, 34
GURGLE_HZ, GURGLE_RISE_OCTAVES_PER_S = 599, 0.8


def water(count=2300, gurgle_count=320, gulp_count=60, drop_count=1800):
    """The stream traps a swarm of small bubbles and a few hundred large ones, and throws fine spray."""
    clock = np.arange(N) / SR
    t = clock - POUR_START_S
    end = POUR_END_S + POUR_STOP_S
    running = end - POUR_START_S
    opening = np.clip(t / POUR_RISE_S, 0, 1)
    closing = np.clip((running - t) / POUR_STOP_S, 0, 1)
    flow = opening * closing * amp(SURGE_DB * wobble(SURGE_HZ))

    # the square roots turn unit energy into rms 1 over the time each cloud lasts
    swarm = cloud(rng.uniform(POUR_START_S, end, count), pitch_hz=1820, spread=0.692, t60=0.01, rise=0.025)
    swarm *= np.sqrt(running * SR)
    splash = amp(-6) * colour(grains(rate=4000, spread_db=4), SPLASH_SPECTRUM)
    bubbling = amp(POUR_DB + np.interp(clock, *np.transpose(STREAM_FLOW))) * (swarm + splash)

    born = rng.uniform(POOL_S, end, gurgle_count)
    gurgle_hz = GURGLE_HZ * 2 ** (GURGLE_RISE_OCTAVES_PER_S * (born - POOL_S))
    gurgle = cloud(born, gurgle_hz, spread=.24, t60=0.026, rise=.04) * np.sqrt((end - POOL_S) * SR)
    gurgle *= amp(GURGLE_DB - GURGLE_FALL_DB_PER_S * np.maximum(clock - POOL_S, 0))

    drops = rng.uniform(POUR_START_S, end, drop_count)
    mist = cloud(drops, pitch_hz=7400, spread=.38, t60=.007, rise=.04, size_db=6) * np.sqrt(running * SR)
    spray = amp(SPRAY_DB - SPRAY_FALL_DB_PER_S * t) * mist

    out = flow * (bubbling + gurgle + spray)
    for s, db, hz, length in STREAM_GULPS:
        churn = cloud(s + length * rng.random(gulp_count), hz, spread=0.408, t60=0.011, rise=0.031)
        out += amp(db - 9.0) * np.sqrt(length * SR) * churn
    out = air_column(out)
    for s, db, hz, t60 in SINGLE_BUBBLES:
        add(out, s, amp(db + 3) * bubble(hz, t60, T, rise=0.061))
    return kitchen(out, wet_db=-14.5, pan_db=-2.0, early_db=-5.5)


def scene():
    """Mix everything in the kitchen, from the background to the ice and water close by."""
    background = room_tone() + door() + cupboard() + dishes()
    coffee = squeaks() + blows()
    ice = scrapes() + scoop() + mug() + cracks()
    return background + coffee + ice + water()


def record(dry):
    """Keep only what lies below the top frequency."""
    return filtered(dry, lambda hz: hz < TOP_HZ)


dry = scene()
out = record(dry)
bounce(out)
```